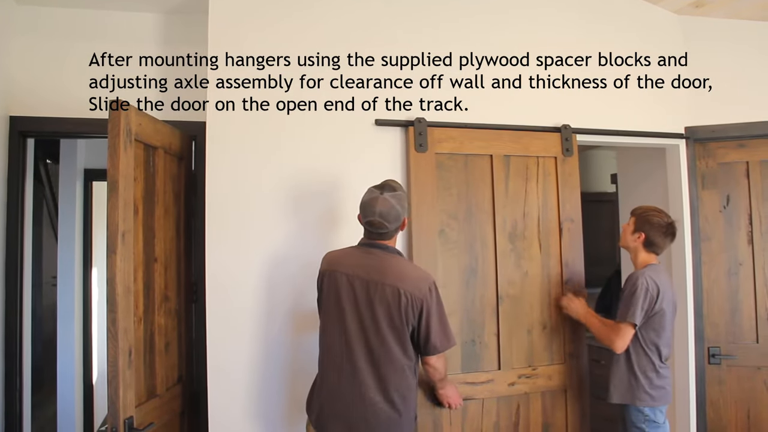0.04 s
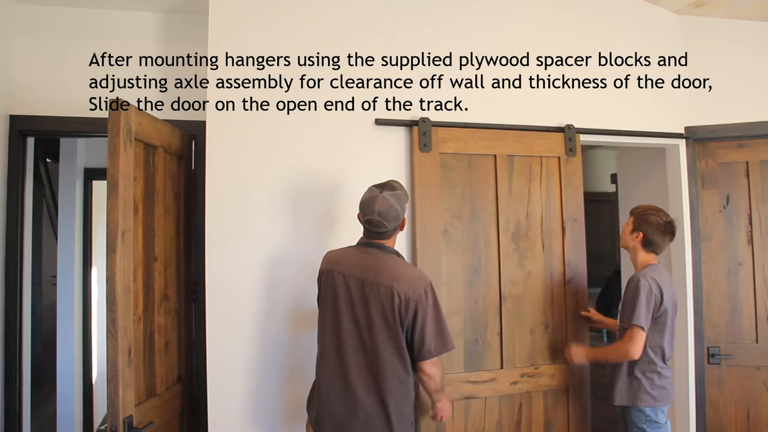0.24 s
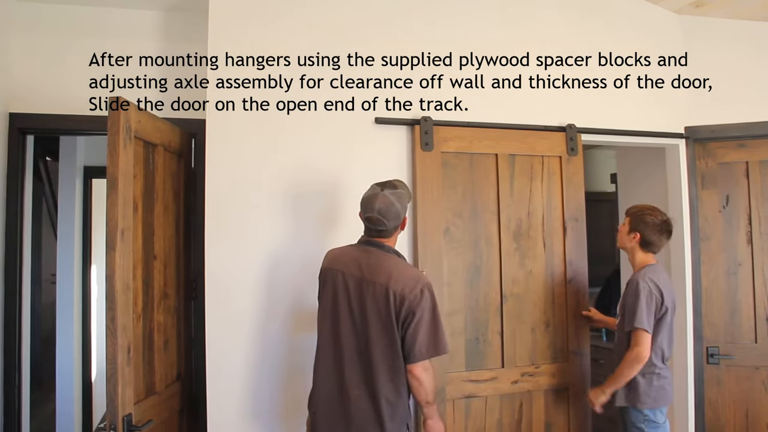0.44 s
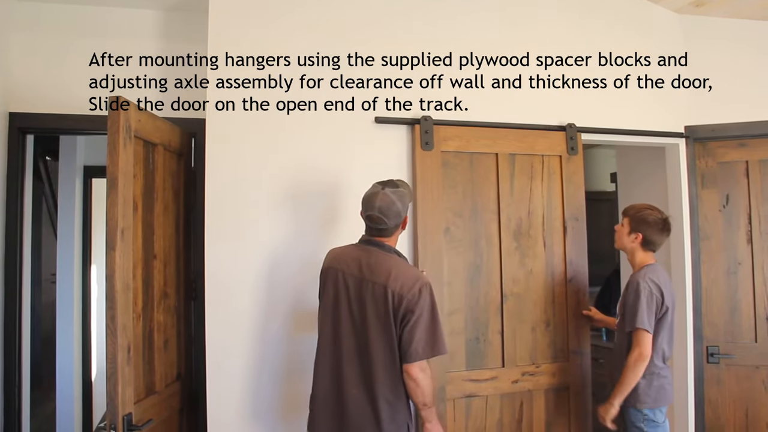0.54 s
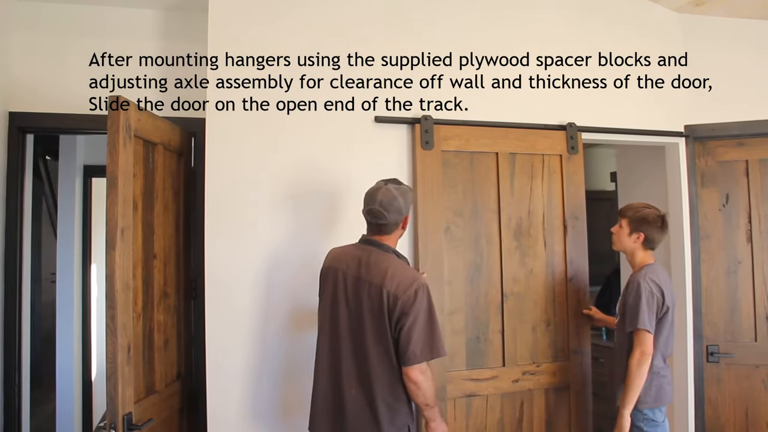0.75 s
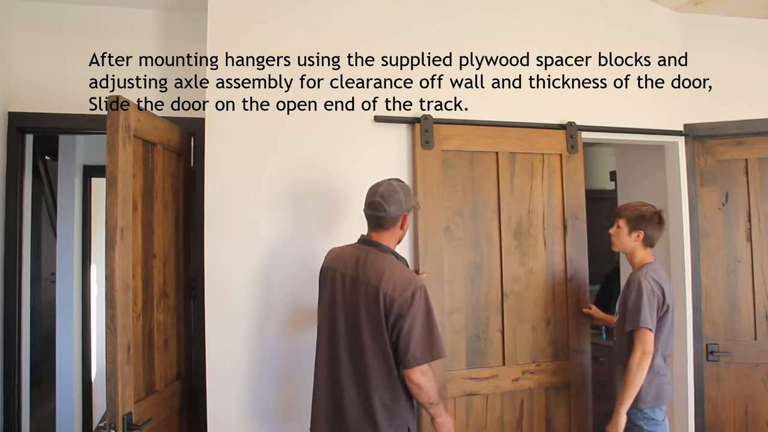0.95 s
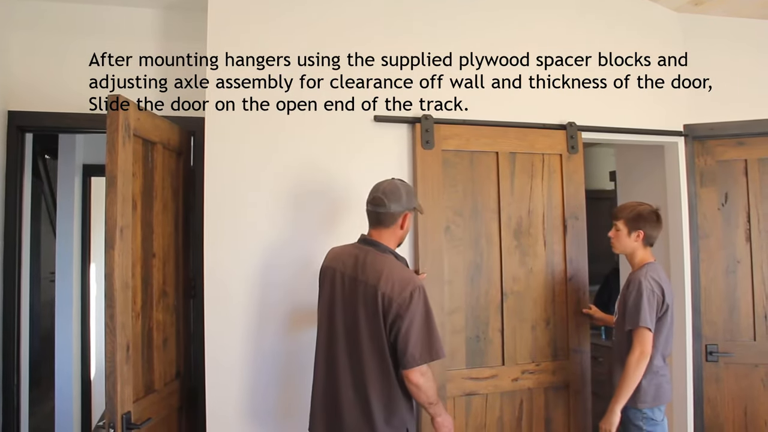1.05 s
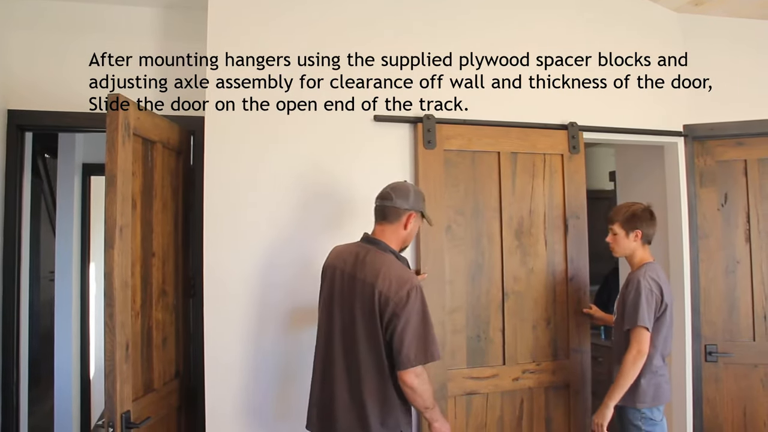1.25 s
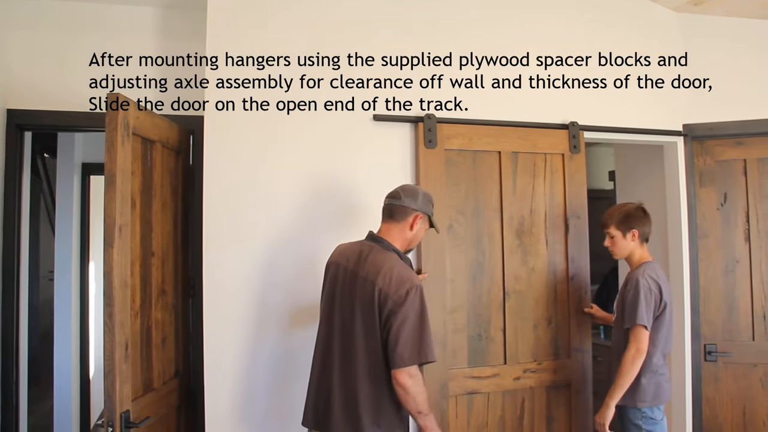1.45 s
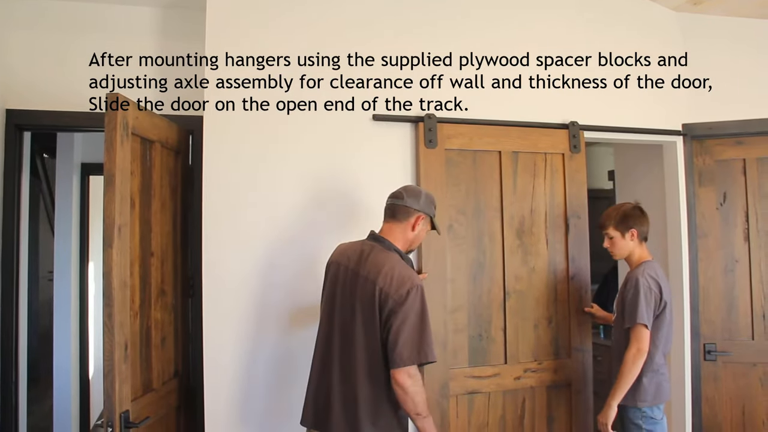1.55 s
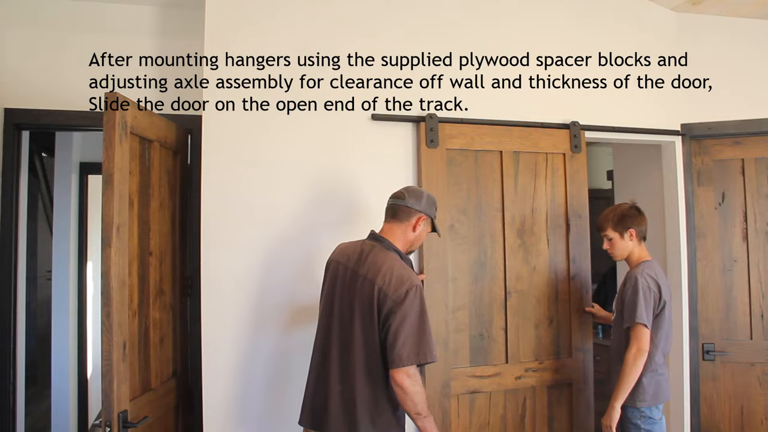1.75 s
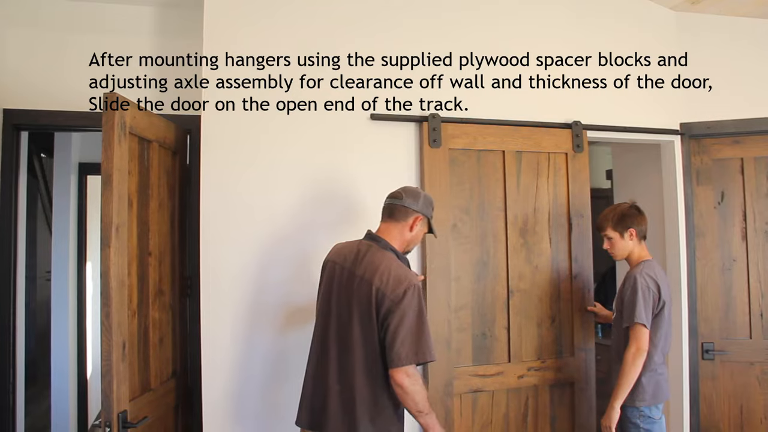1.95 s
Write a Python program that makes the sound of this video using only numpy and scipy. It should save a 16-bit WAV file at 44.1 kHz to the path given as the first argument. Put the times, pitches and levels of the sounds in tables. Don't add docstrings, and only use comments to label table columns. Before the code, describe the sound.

Two brief low, woody rolling rumbles of a hanging plank door over steady room noise

```python
import sys
import numpy as np
from scipy import signal
from scipy.fft import rfft, irfft, next_fast_len
from scipy.io import wavfile
from scipy.ndimage import map_coordinates

SR = 44100
rng = np.random.default_rng(int(sys.argv[2]) if len(sys.argv) > 2 else 0)


def rack_gain(trim_db):
    fader = np.asarray(trim_db, float)
    return 10 ** (fader / 20)


def materialize(psi):
    bounded = np.clip(np.atleast_2d(psi).T, -1, 1)
    quanta = np.round(bounded * 32767).astype(np.int16)
    wavfile.write(sys.argv[1], SR, quanta)


N = 88200
T_S = np.arange(N) / SR
SECOND_PUSH_S = 0.9


def unit(x):
    return x / np.sqrt(np.mean(x ** 2) + 1e-20)


def along(points, hz):
    f, value = np.transpose(points)
    return np.interp(np.log(hz + 1), np.log(f + 1), value)


def curves(rows):
    s, *columns = np.transpose(rows)
    return [np.interp(T_S, s, column) for column in columns]


def wobble(knots_per_s):
    return map_coordinates(rng.standard_normal(400), [np.arange(N) * knots_per_s / SR])


def filtered(x, response):
    size = next_fast_len(N + SR // 2)
    return irfft(rfft(x, size) * response(np.fft.rfftfreq(size, 1 / SR)), size)[..., :N]


def modes(rows, f):
    total = 0
    for k, (hz, width_hz, level_db) in enumerate(rows):
        damping = 1j * f * width_hz
        total = total + (-1) ** k * rack_gain(level_db) * damping / (hz * hz - f * f + damping)
    return total


def band(x, hz, width_hz):
    return unit(filtered(x, lambda f: modes([(hz, width_hz, 0)], f) ** 2))


def track(rows):
    first, last = rows[0], rows[-1]
    hz, level_db = curves([(first[0] - .05, first[1], -70), *rows, (last[0] + 0.061, last[1], -70)])
    return 2 * np.pi * np.cumsum(hz) / SR, np.sqrt(2) * rack_gain(level_db)


def house():
    # hz, level_db (per Hz)
    spectrum = [(22, -9), (60, -5), (200, -5), (700, -9), (1800, -18.5), (5000, -30.5), (10000, -39),
                (15500, -50.5)]
    # hz, width_hz, lift_db
    room_modes = [(108.4, 23, 7.5), (196.4, 8.5, 8.5), (226, 48, 3.5), (378, 15, -1.5), (795, 13, 0.5)]

    def response(f):
        lift = 1 + sum(rack_gain(db) / (1 + ((f - hz) / width_hz * 2) ** 2) for hz, width_hz, db in room_modes)
        return rack_gain(along(spectrum, f)) * lift

    level_db = -34.5 + 1.1 * wobble(4.1)
    return rack_gain(level_db) * unit(filtered(rng.standard_normal(N), response))


def room(x):
    # hz, t60_s
    decay = [(100, 0.46), (1000, 0.54), (8000, 0.26)]
    hz, t, z = signal.stft(rng.standard_normal(SR // 2), SR, nperseg=256)
    fall = rack_gain(-60 * t / along(decay, hz)[:, None])
    tail = signal.istft(z * fall, SR, nperseg=256)[1]
    delayed = np.pad(x, (400, 0))
    return signal.fftconvolve(delayed, tail / np.linalg.norm(tail))[:N]


def grit():
    # start_s, level_db, t60_s
    grit_ticks = [
        (0.333, -29, 0.027),
        (1.229, -34, .02),
        (1.741, -32, 0.011),
        (1.902, -33.5, .015),
    ]
    low_hz, high_hz = 700, 6000
    out, t = np.zeros(N + SR), np.arange(1600) / SR
    for start_s, level_db, t60_s in grit_ticks:
        burst = rack_gain(level_db - 60 * t / t60_s) * rng.standard_normal(len(t))
        out[round(start_s * SR):][:len(t)] += burst
    return filtered(out[:N], lambda f: 1j * f / (low_hz + 1j * f) * (high_hz / (high_hz + 1j * f)) ** 3)


def scuffs():
    # middle_s, half_length_s, hz, width_hz, level_db
    rubs = [
        (1.305, .05, 6600, 1600, -48),
        (1.395, .012, 2600, 3000, -38),
    ]
    out = 0
    for middle_s, half_s, hz, width_hz, level_db in rubs:
        swell = np.exp(-((T_S - middle_s) / half_s) ** 2)
        out = out + rack_gain(level_db) * swell * band(rng.standard_normal(N), hz, width_hz)
    return out


def lurch():
    jolt_s = [
        .285,
        .36,
        1.295,
        1.3,
        1.365,
        1.37,
    ]
    # hz, level_db, t60_s
    rings = [
        (45, -27, 0.14),
        (202.2, -9.5, 0.2),
        (47.4, -16, 0.13),
        (162.3, -17.5, 0.42),
        (227.9, -15, 0.37),
        (44, -24, 0.28),
    ]
    rise_s = .02
    late_s = np.clip(T_S - np.array(jolt_s)[:, None], 0, None)
    hz, level_db, t60_s = np.transpose(rings)[..., None]
    envelope = rack_gain(level_db - 60 * late_s / t60_s) * (1 - np.exp(-late_s / rise_s))
    return np.sum(envelope * np.sin(2 * np.pi * hz * late_s), axis=0)


def stile():
    # start_s, pitch_hz, level_db
    stile_glides = [
        [(.27, 402, -49), (.31, 410.6, -24.5), (.35, 407.3, -21), (.375, 426.5, -23), (.41, 435.7, -25),
         (.45, 424, -28)],
        [(1.2, 400, -36.5), (1.26, 406.2, -26), (1.3, 421.2, -21), (1.335, 408, -29), (1.365, 414, -20),
         (1.4, 433, -23), (1.455, 440, -26), (1.5, 440, -55)],
    ]
    rough_db, jitter_rad = 2, .6
    out = 0
    for phase, gain in map(track, stile_glides):
        rough_gain = gain * rack_gain(rough_db * wobble(44.5))
        out = out + rough_gain * np.cos(phase + jitter_rad * wobble(34.47))
    return out


def panel():
    # start_s, pitch_hz, level_db
    panel_glides = [
        [(.24, 96.9, -51.5), (.28, 95, -22), (.3, 100, -32), (.325, 104.7, -16), (.37, 97.9, -23.5),
         (.43, 99, -16), (.48, 101, -17), (.64, 99, -35.5), (.79, 99.7, -40.5)],
        [(1.39, 99.8, -36), (1.43, 103.5, -28), (1.51, 99.1, -29), (1.56, 96.8, -41), (1.68, 105, -35.5)],
    ]
    # multiple, level_db
    overtones = [(2, -14.5), (3, -19.5)]
    out = 0
    for phase, gain in map(track, panel_glides):
        swing = np.cos(phase)
        for multiple, level_db in overtones:
            swing = swing + rack_gain(level_db + 5.3 * wobble(14)) * np.cos(multiple * phase + 1.54)
        out = out + gain * swing
    return out


def washer(force_db):
    taps_per_s, first_s, spread_db = 101, .351, 2.5
    tapped = np.diff(np.floor((T_S - first_s) * taps_per_s), prepend=0) > 0
    taps = tapped * rack_gain(spread_db * rng.standard_normal(N))
    return rack_gain(force_db - 44) * band(taps, hz=12300, width_hz=1600)


def wheel_hiss(rough, hiss_db):
    # hz, level_db (per Hz)
    first = [(900, -11), (1500, -1), (2900, -4.5), (4200, -12), (7000, -13.5), (11000, -21.5), (15500, -46)]
    # hz, level_db (per Hz)
    second = [(900, -19), (1500, 6), (3500, 2.5), (5000, -16), (6800, -12.5), (9500, -11), (12500, -28),
              (15500, -40)]
    # hz, level_db (per Hz)
    last = [(900, -20), (2000, 1), (5000, -4), (8000, 0), (12000, -6), (15500, -25)]
    last_slide_s = 1.75
    noise = rough[::-1]
    hisses = []
    for spectrum in (first, second, last):
        hisses.append(unit(filtered(noise, lambda f: rack_gain(along(spectrum, f)) * (f > 900))))
    hiss = np.select([T_S < SECOND_PUSH_S, T_S < last_slide_s], hisses[:2], hisses[2])
    return rack_gain(hiss_db + 2.7 * wobble(26.25)) * hiss


def shaken_modes(drive):
    # hz, width_hz, first_push_db, second_push_db
    door_modes = [(47.7, 38, -18, -23), (113, 37, -39, -4), (152, 7.8, -1, -10), (208.7, 7.5, -14, -7),
                  (238.7, 35, -8, -6.5), (301.6, 19, -3.5, -2.5), (363.5, 14.3, -1, -2),
                  (408, 20.3, -1, -4.5), (440, 14, -5, -4.5), (493.6, 27, -3.5, -7), (566, 42, -8, -10.5),
                  (643.3, 22, -5, -4), (797, 32, -15, -9), (891, 19.3, -6.5, -9)]
    # hz, width_hz, first_push_db, second_push_db
    rail_modes = [(1058, 28, -13.5, -21), (1225, 39, -12.5, -16), (1410, 110, -38, -36),
                  (3230, 410, -30.5, -40.5), (7040, 2600, -57, -44.5)]
    # hz, level_db
    body = [(25, -36), (80, -13), (300, -23.5), (1000, -15.5), (1800, -29), (4000, -59), (9000, -61)]
    out = 0
    for push, gate in enumerate([T_S < SECOND_PUSH_S, T_S >= SECOND_PUSH_S]):
        rows = [(hz, width_hz, levels_db[push]) for hz, width_hz, *levels_db in [*door_modes, *rail_modes]]
        out = out + filtered(drive * gate, lambda f: modes(rows, f) + rack_gain(along(body, f)))
    return rack_gain(20.5) * out


def rolling():
    # start_s, force_db, hiss_db
    motion = [(0, -30.5, -44.5), (.08, -36.5, -50.5), (.2, -38, -57.5), (.225, -27.5, -44),
              (.3, -23, -37.5), (.34, -17.5, -41), (.39, -18.5, -39), (.455, -24.5, -47.5),
              (.54, -39.5, -49), (1.15, -51, -71), (1.24, -24, -48.5), (1.3, -18, -40), (1.345, -17, -44),
              (1.39, -18.5, -35.5), (1.46, -23.5, -45.5), (1.56, -44.5, -51), (1.89, -44, -94),
              (1.94, -39.5, -54.5)]
    bumps_per_s, bump_spread_db, bump_share = 900, 3, .4
    force_db, hiss_db = curves(motion)
    struck = rng.random(N) < bumps_per_s / SR
    bumps = struck * rack_gain(bump_spread_db * rng.standard_normal(N)) * rng.choice([-1, 1], N)
    rough = unit(rng.standard_normal(N) + bump_share * unit(bumps))
    drive = rack_gain(force_db + 0.23 * wobble(31.2)) * rough
    return shaken_modes(drive) + washer(force_db) + wheel_hiss(rough, hiss_db)


def scene():
    door = rolling() + grit() + scuffs()
    reverb = rack_gain(-10) * room(door)
    return (house() + reverb + lurch() + stile() + panel() + door)[None]


def dropouts(dry):
    # middle_s, lost_above_hz, kept_hz, kept_hz
    losses = [
        (0.32, 4000, 6000, 8500),
        (0.618, 3800, 4150, 5000),
        (0.724, 2900, 3700, 5200),
    ]
    length_s, depth, kept_gain, kept_width_hz = .0078, .97, 1.8, 200
    out = 0
    for middle_s, above_hz, *kept_hz in losses:
        def lost(f):
            kept = sum(np.exp(-((f - hz) / kept_width_hz) ** 4) for hz in kept_hz)
            return (1 - kept_gain * kept) / (1 + (above_hz / (f + 1)) ** 16)

        out = out + depth * np.exp(-((T_S - middle_s) / length_s) ** 2) * filtered(dry, lost)
    return out


def roll_off(x):
    return signal.sosfilt(signal.butter(12, 15760, fs=SR, output="sos"), x)


def record(dry):
    top, knee = .56, 5
    dry = dry / (1 + np.abs(dry / top) ** knee) ** (1 / knee)
    whistle = rack_gain(-74) * band(rng.standard_normal(N), hz=15715, width_hz=150)
    return roll_off(dry + whistle - dropouts(dry))


dry = scene()
out = record(dry)
materialize(out)
```